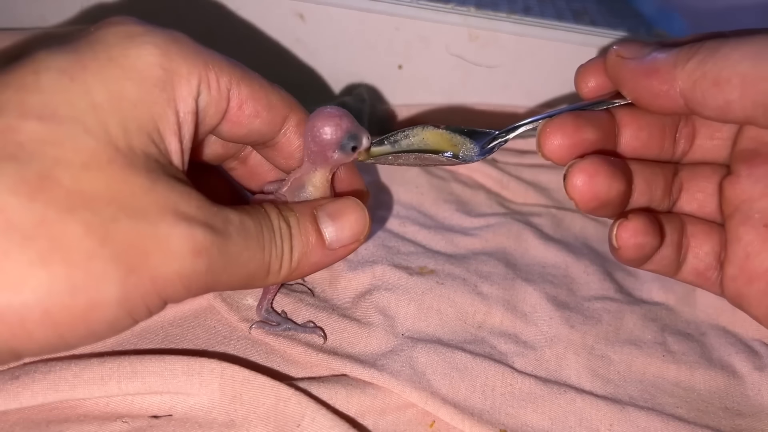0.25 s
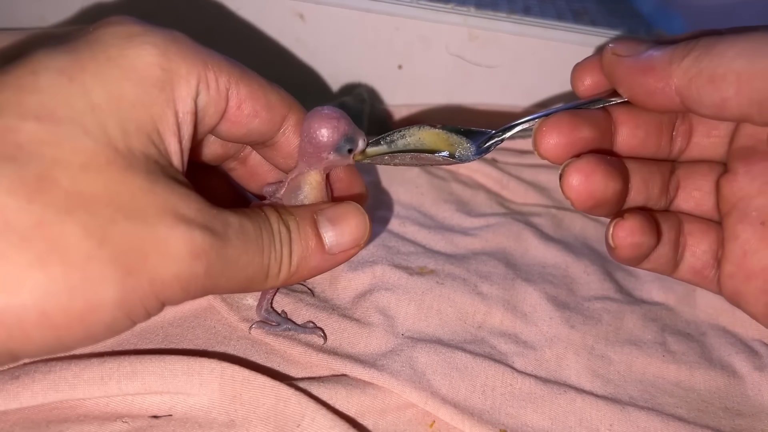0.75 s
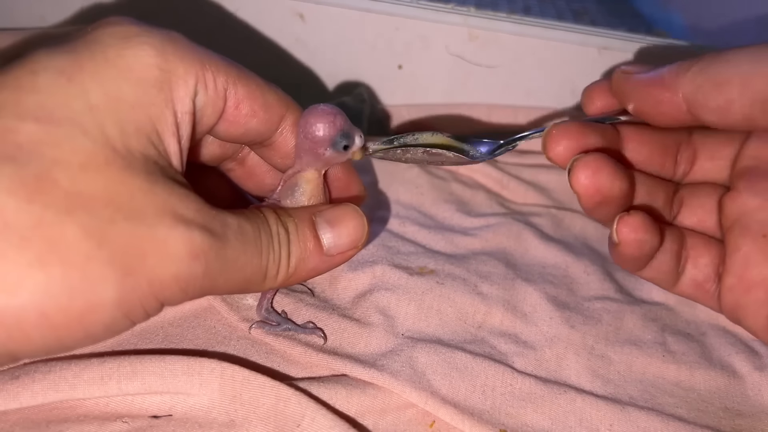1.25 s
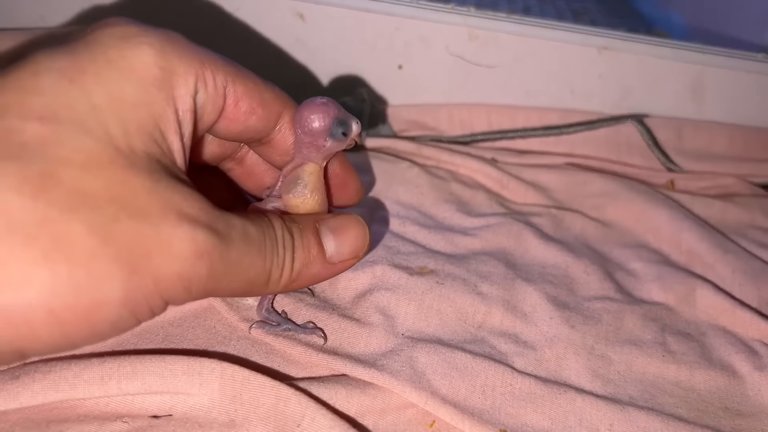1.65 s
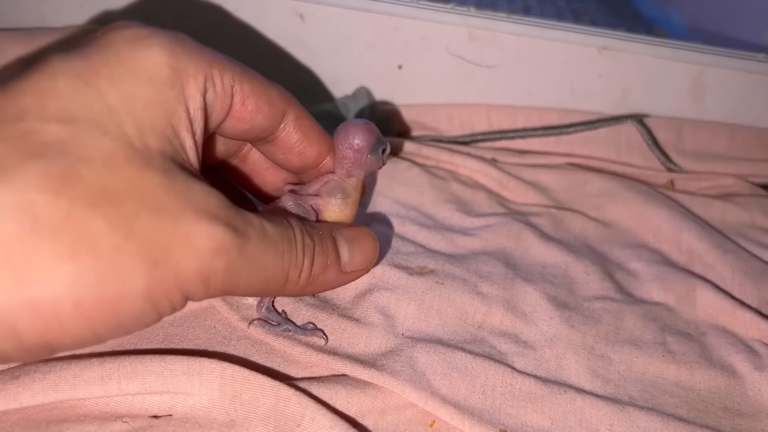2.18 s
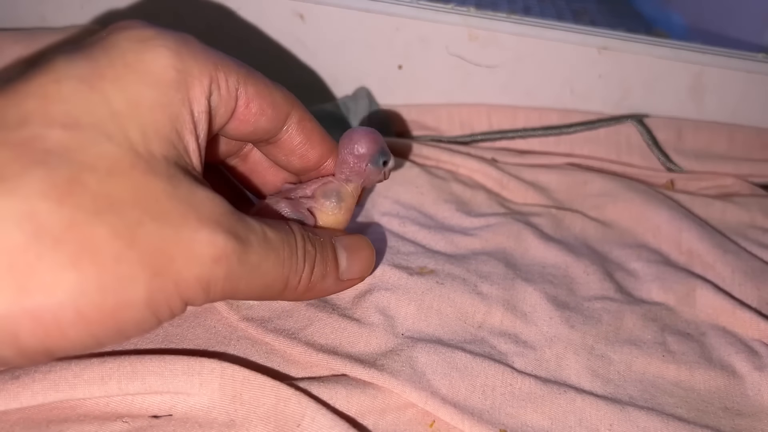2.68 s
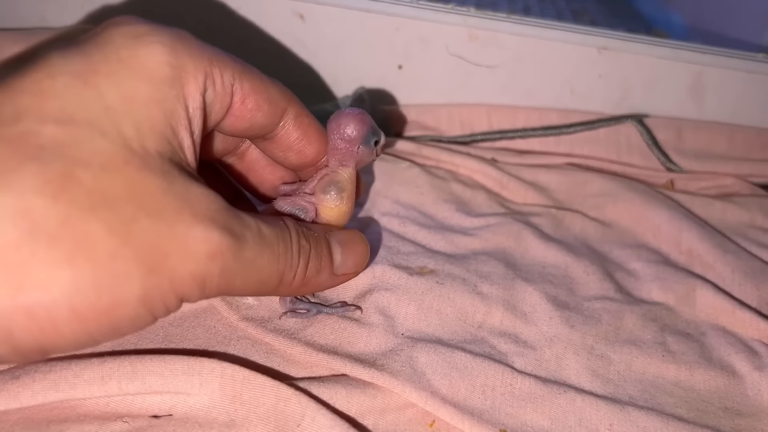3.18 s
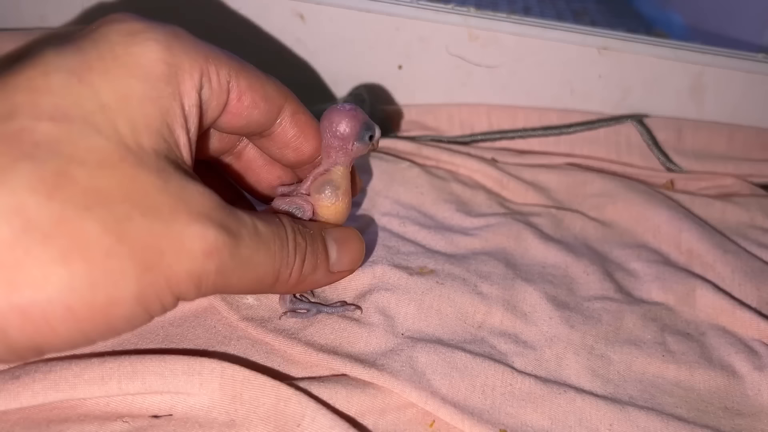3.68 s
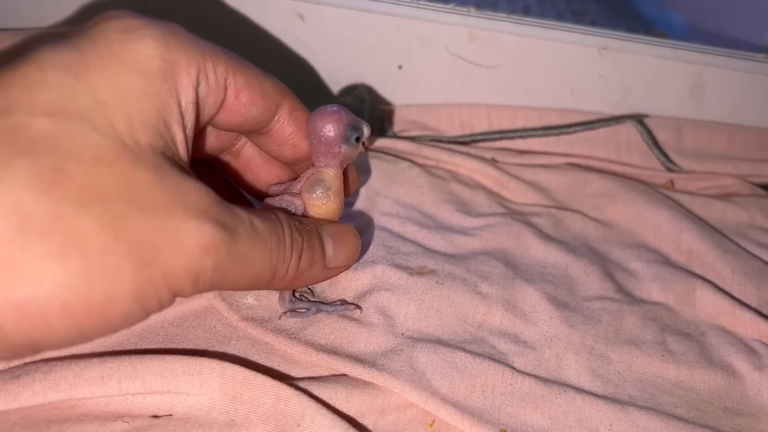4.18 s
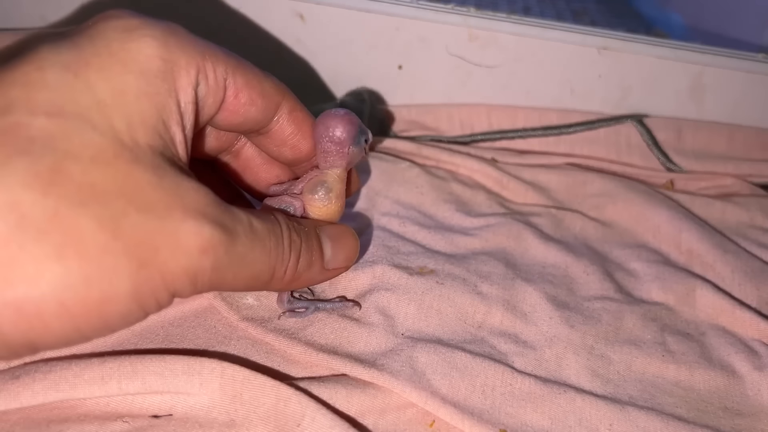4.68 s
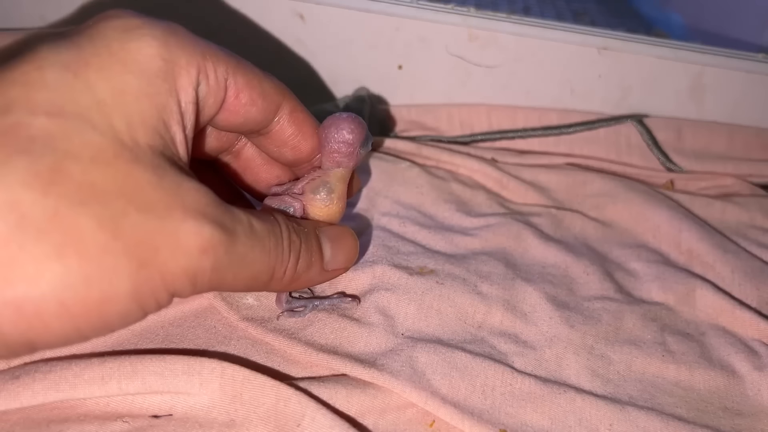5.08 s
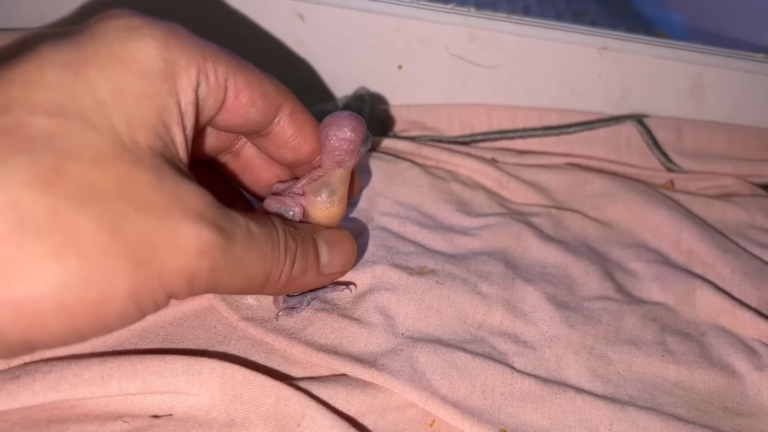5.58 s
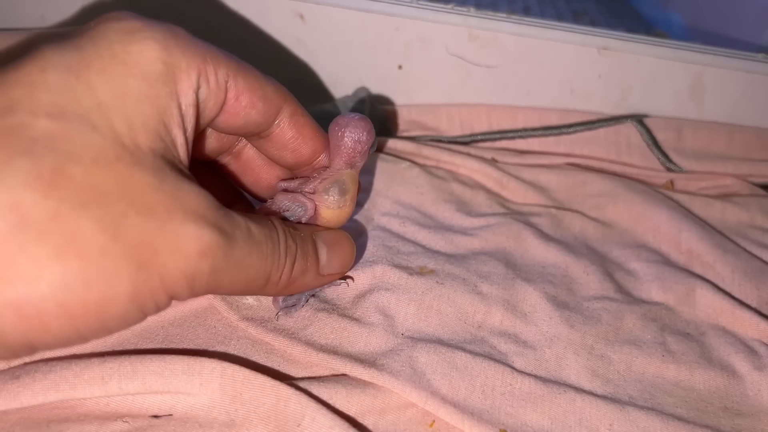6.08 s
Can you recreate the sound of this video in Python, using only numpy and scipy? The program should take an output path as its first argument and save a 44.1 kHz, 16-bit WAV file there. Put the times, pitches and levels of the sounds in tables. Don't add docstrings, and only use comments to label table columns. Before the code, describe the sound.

Close warbling nestling chirps, unevenly spaced, over quiet room air, with distant echoing knocks, harsh parrot squawks and faint low handling rumble.

```python
import sys
import numpy as np
from scipy import signal
from scipy.fft import rfft, irfft, next_fast_len
from scipy.io import wavfile
from scipy.ndimage import uniform_filter1d

SR = 44100
rng = np.random.default_rng(int(sys.argv[2]) if len(sys.argv) > 2 else 0)


def ratio_of_db(decibels):
    return 10 ** (np.asarray(decibels, float) / 20)


def digitize_waveform(pressure):
    field = np.atleast_2d(pressure).T
    bounded = np.clip(field, -1, 1)
    quanta = np.round(bounded * 32767).astype(np.int16)
    wavfile.write(sys.argv[1], SR, quanta)


N = 279594
T = np.arange(N) / SR

# (start [s], end [s], level [dB], overtones [dB], last pitch [Hz]); a low last pitch is a gulp
CHIRPS = [
    (-.06, .088, -35, 2.5, 1300),
    (.765, .955, -33, -3, 3000),
    (1.963, 2.159, -38.5, -2.5, 1350),
    (2.43, 2.765, -35.5, -3, 3400),
    (3.232, 3.432, -37, 0, 3880),
    (4.15, 4.362, -35.5, -1, 1350),
    (4.604, 4.908, -36, 1, 3520),
    (5.278, 5.515, -37, 1, 2500),
    (5.909, 6.188, -37.5, 1, 3300),
]
# (crest [s], crest [Hz], trough [Hz], rebound [Hz])
THROBS = [(0.0, 4400, 3300, 3480), (.054, 3730, 3250, 2400), (.812, 4930, 3800, 3600),
          (.864, 5170, 4600, 3450), (.932, 5000, 3800, 3000), (2.013, 4780, 3520, 3350),
          (2.069, 4370, 3300, 3170), (2.121, 3640, 3050, 2300), (2.475, 4970, 3820, 3980),
          (2.534, 4930, 3700, 3970), (2.598, 4000, 3400, 3900), (2.655, 4150, 3390, 3750),
          (2.71, 3750, 3450, 3600), (3.285, 4930, 3640, 3520), (3.342, 4270, 3550, 3900),
          (3.399, 4040, 3390, 3700), (4.204, 4550, 3520, 3470), (4.257, 4370, 3440, 3850),
          (4.317, 4000, 3300, 2700), (4.669, 4520, 3640, 3970), (4.727, 4410, 3410, 3850),
          (4.789, 4130, 3360, 3790), (4.85, 3880, 3130, 3300), (5.335, 4590, 3730, 4070),
          (5.396, 4410, 3470, 3970), (5.46, 4170, 3410, 3850), (5.969, 4620, 3850, 4000),
          (6.028, 4550, 3820, 3950), (6.09, 4340, 3470, 3880), (6.145, 3800, 3600, 3200)]
LEDGE_S = (.036, .024)
LEDGE_HZ = 3480


def at_hz(table, hz):
    f, v = np.transpose(table)
    return np.interp(np.log(np.maximum(hz, 1)), np.log(f), v)


def colour(x, table, share=1):
    size = next_fast_len(N)
    gain = ratio_of_db(share * at_hz(table, np.arange(size // 2 + 1) * SR / size))
    return irfft(rfft(x, size) * gain, size)[..., :N]


def wobble(rate_hz):
    low_pass = signal.butter(2, rate_hz, fs=SR, output="sos")
    x = signal.sosfilt(low_pass, rng.standard_normal(N))
    return x / x.std()


def gate(start_s, end_s, rise_s, fall_s):
    return np.clip((T - start_s) / rise_s, 0, 1) * np.clip((end_s - T) / fall_s, 0, 1)


def spells(rows, rest_db):
    levels_db = [rest_db + 0 * T]
    for peak_s, db, rise_s, fall_s in rows:
        levels_db.append(db - 10 * np.maximum((peak_s - T) / rise_s, (T - peak_s) / fall_s))
    return np.max(levels_db, axis=0)


def echo(x, t60_table, build_s, size):
    t = T[:size]
    bins_hz = np.arange(size // 2 + 1) * SR / size
    noise = rfft(rng.standard_normal((2, size)))
    tail = 0
    for hz in 40 * 2 ** np.arange(0, 9, .5):
        band_pass = np.clip(1 - 2 * abs(np.log2((bins_hz + 1) / hz)), 0, 1)
        band = irfft(noise * band_pass, size)
        t60_s = at_hz(t60_table, hz)
        tail = tail + band * ratio_of_db(-60 * t / t60_s) / np.sqrt(t60_s * SR / (2 * np.log(1000)))
    return signal.fftconvolve(x[None], tail * (1 - np.exp(-t / build_s)), axes=1)[:, :N]


def stack(hz, partial_db, tract):
    phase = 2 * np.pi * np.cumsum(hz) / SR
    out = 0
    for k, db in enumerate(partial_db, 1):
        audible = k * hz < .45 * SR
        out = out + ratio_of_db(db + at_hz(tract, k * hz)) * audible * np.sin(k * phase)
    return out


def hush():
    # (frequency [Hz], level [dB per Hz])
    air_tone = [(18, -32.5), (30, -2.5), (108, -2.5), (291, -17.5), (450, -23), (750, -21), (896, -42),
                (1100, -20), (1490, -19.5), (2030, -41), (2490, -31.5), (3130, -35), (6740, -40.5),
                (12400, -46.5), (13400, -58)]
    # (loudest [s], level [dB], rise [s per 10 dB], fall [s per 10 dB])
    bustle_spells = [
        (.1, -61, .17, .8),
        (.51, -52.5, .15, .6),
        (1.45, -59, .5, .8),
        (2.4, -61, 1.1, 1.5),
        (3.37, -56, .4, .3),
        (3.8, -66, 2.1, .5),
        (4.3, -66, .15, .2),
        (5.3, -58.5, .1, .6),
        (5.81, -58.5, .5, .7),
        (6.15, -61, 1.5, .17),
    ]
    # (frequency [Hz], level [dB])
    bustle_tone = [(30, -27.5), (60, -1), (150, -9.5), (400, -0.5), (900, -8), (1800, -10), (4000, -28.5)]
    air = colour(rng.standard_normal((2, N)), air_tone) * ratio_of_db(2.6 * wobble(10))
    air = air * ratio_of_db(-66.74) / air.std()
    hum = ratio_of_db(-73 + 1.1 * wobble(2.4)) * np.sin(2 * np.pi * 100 * T)
    bustle = colour(rng.standard_normal((2, N)), bustle_tone)
    bustle = bustle / bustle.std() * ratio_of_db(spells(bustle_spells, rest_db=-81) + 1.58 * wobble(4.4))
    return air + hum + bustle


def knocks():
    # (time [s], thud [dB], ring [Hz], click minus thud [dB])
    blows = [(0.258, -51, 350, -7.5), (0.392, -40, 444, -8.5), (0.588, -50, 406, -11.5),
             (1.451, -48.5, 420, -1), (1.489, -54, 490, -25), (1.708, -50.5, 1320, -11.5),
             (1.81, -50, 342, -12.5), (1.885, -59, 692, -1), (2.374, -49, 1430, -1.5),
             (2.876, -55, 1154, -7.5), (3.161, -42, 469, -16), (3.199, -46.5, 356, -4),
             (3.555, -53, 441, -22.5), (5.037, -64, 450, -5.5), (5.12, -55, 374, -11.5),
             (5.28, -76, 415, 10.5), (5.678, -47, 350, 1), (5.814, -57, 1330, 3)]
    size = 2048
    out, t = np.zeros(N + size), T[:size]
    for s, db, hz, click_db in blows:
        ring = np.sin(2 * np.pi * hz * t) * ratio_of_db(-60 * t / .031)
        if hz < 600:
            ring = ring + .42 * np.sin(2 * np.pi * 1.684 * hz * t) * ratio_of_db(-60 * t / .04)
        click = ratio_of_db(click_db + 11.5) * rng.standard_normal(size) * ratio_of_db(-60 * t / .0038)
        i = int(s * SR)
        out[i:i + size] += ratio_of_db(db + 23.5) * (.34 * ring + click)
    return colour(out[:N], [(100, -8), (2000, 0.5), (6000, -8), (13000, -20.5)])


def parrots():
    # (start [s], swell [s], peak [dB], first pitch [Hz], pitch at the peak [Hz])
    squawks = [(.575, .018, -52, 2700, 2740), (.584, .012, -51, 3500, 3900), (.705, .045, -41, 1470, 1582),
               (.88, .045, -34.5, 1934, 2280), (.965, .03, -43, 2330, 2350), (1.03, .06, -41, 3400, 3580),
               (1.035, .055, -43.5, 1850, 2080), (2.575, .03, -39, 3450, 3550),
               (2.565, .03, -36, 2360, 2420), (2.685, .055, -39, 1750, 1830), (2.77, .06, -28, 2300, 2450),
               (5.39, .04, -49, 2310, 2380), (5.475, .065, -36, 2790, 3600), (5.53, .08, -37, 1900, 2240)]
    # (roughness [0-1], fall per overtone [dB], swell [dB])
    voices = [(.15, -14, 2), (.4, -.5, 1.5), (.4, -3, 3), (.55, .5, 7), (.55, 0, 8), (.2, -4, 5),
              (.6, -1, 4), (.5, -6, 5), (.45, -1.2, 6), (.5, -1.5, 3), (.23, -1.5, 12), (.5, -11, 5),
              (.3, -4, 0), (.4, -2, 1)]
    # (frequency [Hz], gain [dB])
    throat = [(1200, -8), (1500, -5.5), (1900, -7), (2400, -1), (3500, 4.5), (4800, 5.5), (6000, -1),
              (7300, 2), (9000, -5.5), (12000, -8.5)]
    fade_db_per_s, fade_s, glide_s, rasp_db = -520, .045, .03, 1.5
    out, scatter, rattle = np.zeros(N), wobble(400), wobble(150)
    rasp = colour(rng.standard_normal(N), throat)
    for (start, swell_s, peak_db, first_hz, peak_hz), (rough, tilt_db, swell_db) in zip(squawks, voices):
        s = start + np.array([0, swell_s, swell_s + fade_s])
        span = slice(int(s[0] * SR), int(s[-1] * SR))
        rough = np.clip(rough, .1, .6)
        glide = np.exp((start - T[span]) / glide_s) - .13
        hz = peak_hz + 1.15 * (first_hz - peak_hz) * glide
        hz = hz * (1 + .13 * rough ** 1.5 * scatter[span])
        db = np.interp(T[span], s, [peak_db - swell_db, peak_db, peak_db + fade_db_per_s * fade_s])
        level = ratio_of_db(db + 9 * rough * rattle[span]) * gate(s[0], s[-1], .014, .012)[span]
        voice = stack(hz, tilt_db * np.arange(7), throat)
        torn_air = ratio_of_db(rasp_db + 2 * tilt_db) * rough * rasp[span]
        out[span] += level * (voice + torn_air)
    return out


def rumble():
    # (strongest [s], level [dB], rise [s per 10 dB], fall [s per 10 dB])
    shifts = [
        (1.0, -59.5, .12, .18),
        (1.6, -71, 3, .5),
        (2.79, -61, .45, .55),
        (3.67, -69, .16, .14),
        (4.36, -68.5, .12, .26),
        (4.66, -64, .14, .045),
        (5.21, -55, .06, .1),
        (5.52, -65, .12, .06),
        (5.72, -62, .06, .7),
    ]
    low = colour(rng.standard_normal((2, N)), [(15, -21), (35, 2), (70, -1.5), (130, -34.5)])
    return low / low.std() * ratio_of_db(spells(shifts, rest_db=-82) - 4.5)


def warble():
    onset_hz, lift_s = 2800, .014
    shoulder_s, shoulder_share, shoulder_cap_hz = .014, .7, 4150
    spike_s, spike_share, spike_foot_hz = .006, .9, 4320
    drop_s, rebound_s, dip_s, dip_hz = .012, .022, .033, 170
    points = []
    for start, end, _, _, last_hz in CHIRPS:
        throbs = [row for row in THROBS if start < row[0] < end]
        ledge = [throbs[0][0] - s for s in LEDGE_S]
        low_hz = LEDGE_HZ
        points += [(start, onset_hz), (max(ledge[0] - lift_s, start), onset_hz)]
        points += [(s, low_hz) for s in ledge]
        for s, crest_hz, trough_hz, rebound_hz in throbs:
            climb_hz = crest_hz - low_hz
            points += [(s - shoulder_s, min(low_hz + shoulder_share * climb_hz, shoulder_cap_hz)),
                       (s - spike_s, min(low_hz + spike_share * climb_hz, spike_foot_hz)),
                       (s, crest_hz)]
            low_hz = min(trough_hz - dip_hz, rebound_hz)
            after = [(s + drop_s, trough_hz), (s + rebound_s, rebound_hz), (s + dip_s, low_hz)]
            points += [p for p in after if p[0] < end - .006]
        points += [(end, last_hz)]
    return np.interp(T, *np.transpose(points))


def breath():
    settle_s, release_s = .06, .022
    chirp = np.searchsorted([c[0] - .01 for c in CHIRPS[1:]], T)
    start, end, db, bright_db, last_hz = np.array(CHIRPS)[chirp].T
    gulp = last_hz < 2000
    gulp_s = .03

    def ramp(t, length_s):
        return np.clip(1 - t / length_s, 0, 1)

    age_s, crests = T - start, np.array(THROBS)[:, 0]
    attack_s = crests[np.searchsorted(crests, start)] - LEDGE_S[0] - start
    db = db + .8 + (-4.5 - 450 * attack_s) * ramp(age_s, attack_s)
    db = db - 3.5 * ramp(age_s, settle_s) - 9 * age_s
    db = db - 6.5 * ramp(end - gulp_s * gulp - T, release_s)
    bright_db = bright_db + .9 + ramp(age_s, settle_s) - 8 * age_s
    bright_db = bright_db - 7 * gulp * ramp(end - gulp_s - T, release_s)
    return db, bright_db


def chick():
    harmonics_db = [0.5, 0.5, -2, -10.5]
    # (frequency [Hz], gain [dB])
    beak = [(1300, 3), (2000, -17), (2700, -5.5), (3500, -4.5), (4700, -2.5), (6000, -9), (7500, 1),
            (8400, 1.5), (9300, -4.5), (10500, -7.5), (12000, -3), (13500, -31)]
    # (time [s], level [dB])
    ticks = [
        (0.071, -32),
        (2.4432, -27.5),
        (4.1354, -47),
        (5.2774, -39),
    ]
    hoarse = sum(gate(c[1] - .055, c[1] - .005, .03, .012) for c in CHIRPS)
    open_beak = sum(gate(c[0] - .001, c[1] + .004, .0015, .006) for c in CHIRPS)
    hz = uniform_filter1d(warble(), size=100) * (1 + .011 * wobble(600))
    db, bright_db = breath()
    db = db + .3 * (hz - LEDGE_HZ) / 1000
    bright_db = bright_db - 20 * np.clip((2700 - hz) / 600, 0, 1)
    overtones_db = [p + bright_db + 3.5 * wobble(70) for p in harmonics_db[1:]]
    whistle = ratio_of_db(wobble(250) - 3 * hoarse) * stack(hz, [harmonics_db[0]] + overtones_db, beak)
    rasp_tone = [(1500, -55.5), (3000, 7), (5000, -3), (7000, 15.5), (9000, -5), (13000, -10.5)]
    rasp = ratio_of_db(-29 * (1 - hoarse) - 6) * colour(rng.standard_normal(N), rasp_tone)
    hiss = colour(rng.standard_normal(N), [(7000, -39.5), (9500, -4), (12000, -1.5)])
    out = open_beak * ratio_of_db(db) * (whistle + rasp + ratio_of_db(bright_db - 19.5) * hiss)
    for s, tick_db in ticks:
        i = int(s * SR)
        out[i:i + 3] += ratio_of_db(tick_db + 5) * np.array([1, -2, 1])
    return out


def scene():
    # (delay [s], left [dB], right [dB])
    bounces = [
        (.0011, -19, -4.5),
        (.0027, -12, -4),
    ]
    left_lag = [13, 17, 12, 15, 11, 10, 14, 12, 10]
    # (frequency [Hz], T60 [s])
    early_t60 = [(1000, .14), (12000, 0.27)]
    # (frequency [Hz], T60 [s])
    near_t60 = [(1000, 0.22), (4000, 0.59), (12000, 0.17)]
    # (frequency [Hz], T60 [s])
    far_t60 = [(200, 1), (500, 0.87), (2000, 0.45), (5000, 0.52), (12000, 0.28)]
    bird, birds, blows = chick(), parrots(), knocks()

    def late(x, lag):
        return np.append(x, 0)[np.maximum(np.arange(N) - lag, -1)]

    chirp = np.searchsorted([c[0] - .02 for c in CHIRPS[1:]], T)
    near = np.array([late(bird, np.array(left_lag)[chirp]), bird])
    for s, left_db, right_db in bounces:
        left = ratio_of_db(left_db) * late(bird, int(s * SR))
        right = ratio_of_db(right_db) * late(bird, int(1.3 * s * SR))
        near = near + np.array([left, right])
    early = ratio_of_db(-3.5) * echo(bird, early_t60, .002, size=8192)
    room = ratio_of_db(-9.5) * echo(bird, near_t60, .002, size=16384)
    house = ratio_of_db(-7) * birds + ratio_of_db(-21) * blows + echo(birds + blows, far_t60, .0061, size=32768)
    return near + early + room + house + hush() + rumble()


def top_cut(x):
    return signal.sosfilt(signal.butter(12, 13590, fs=SR, output="sos"), x)


def record(dry):
    # (frequency [Hz], side minus mid [dB])
    width = [(60, 0), (110, -5.5), (200, -7), (360, -2.5), (650, 2.5), (1190, 0.5), (2160, -1.5), (3930, 2),
             (7150, 0.5), (13000, 3)]
    # (frequency [Hz], left minus right [dB])
    port_tone = [(60, 2.5), (110, -3.5), (200, 1.5), (360, -0.5), (650, 0), (1190, 1.0), (2160, 1.5),
                 (3930, 6.5), (7150, 5.5), (13000, -0.5)]
    # (frequency [Hz], gain [dB])
    capsule = [(20, -23.5), (45, -1.5), (4600, 0.5), (5300, 2), (6200, 0), (8500, 1), (10000, -10),
               (12000, 3.5), (12800, -14.5), (13600, -28)]
    mid = colour(dry[0] + dry[1], width, -.5) / 2
    side = colour(dry[0] - dry[1], width, .5) / 2
    ports = np.array([colour(mid + side, port_tone, .5), colour(mid - side, port_tone, -.5)])
    return top_cut(colour(ports, capsule))


dry = scene()
out = record(dry)
digitize_waveform(out)
```